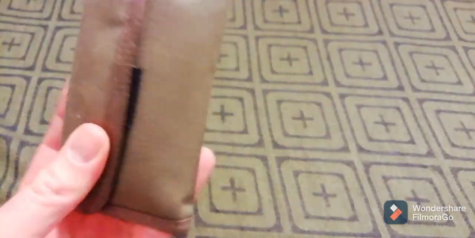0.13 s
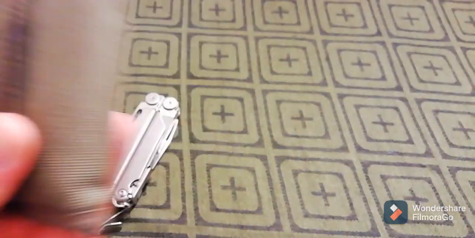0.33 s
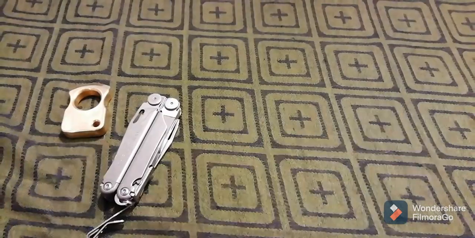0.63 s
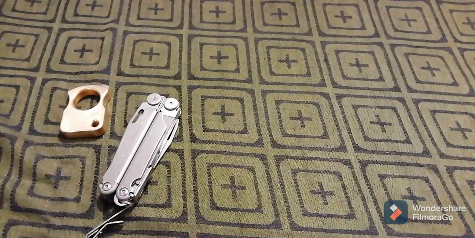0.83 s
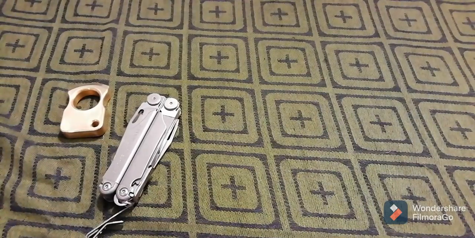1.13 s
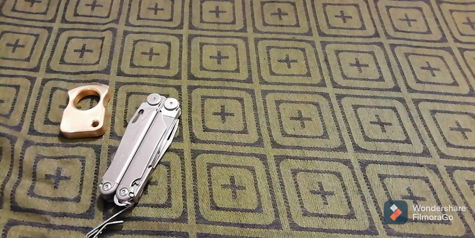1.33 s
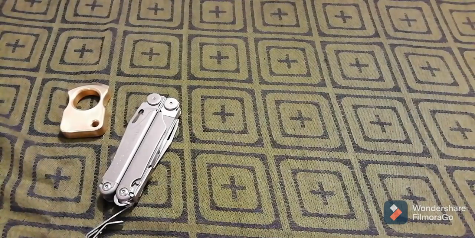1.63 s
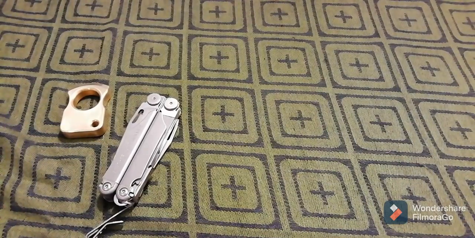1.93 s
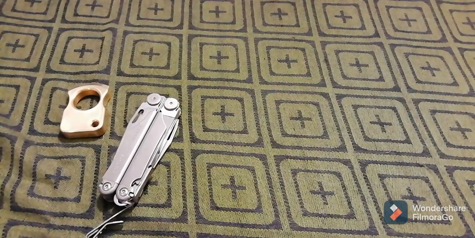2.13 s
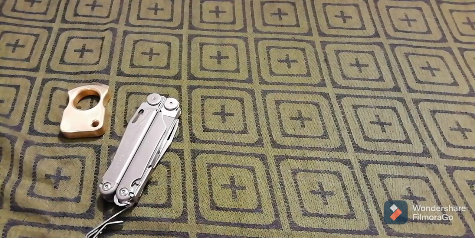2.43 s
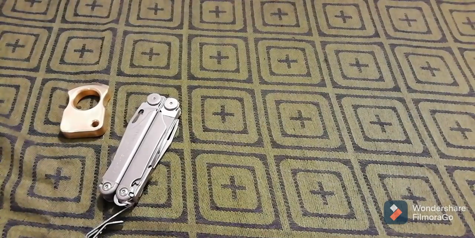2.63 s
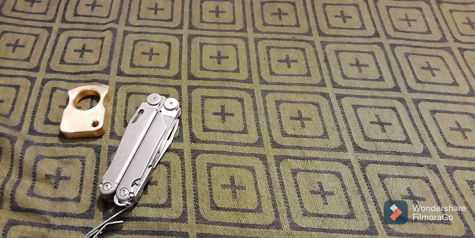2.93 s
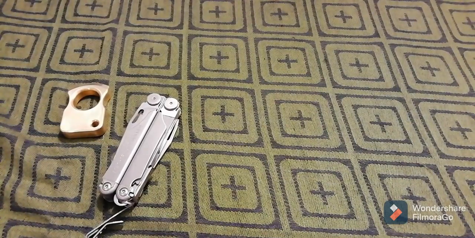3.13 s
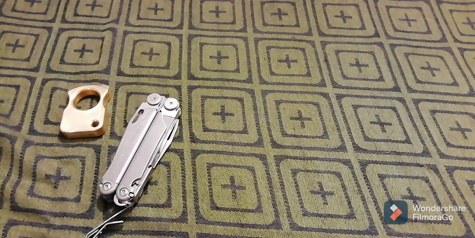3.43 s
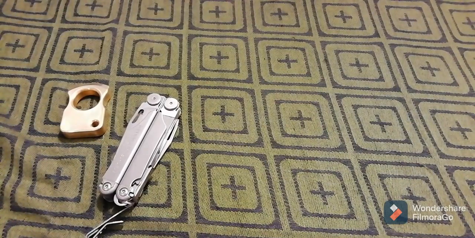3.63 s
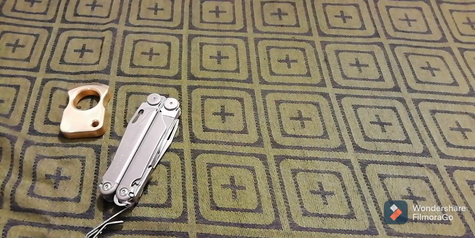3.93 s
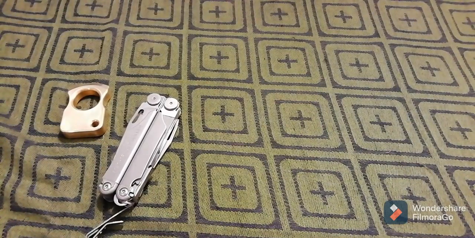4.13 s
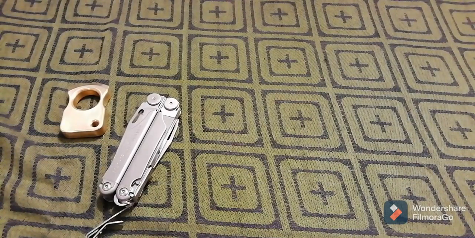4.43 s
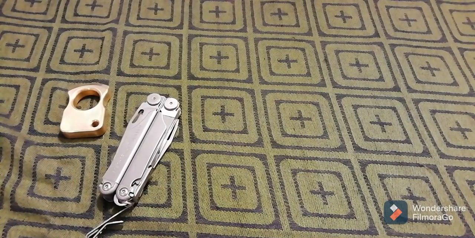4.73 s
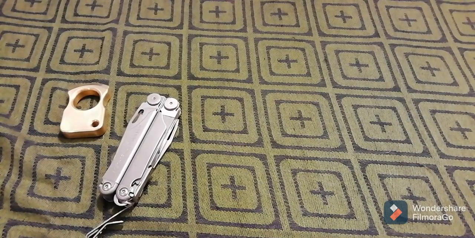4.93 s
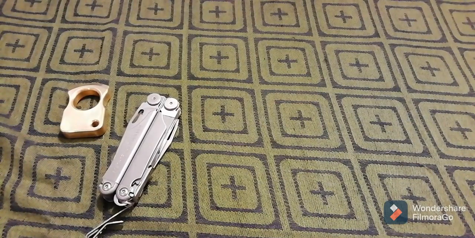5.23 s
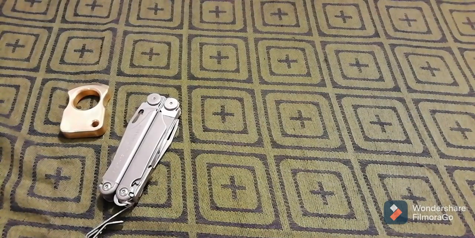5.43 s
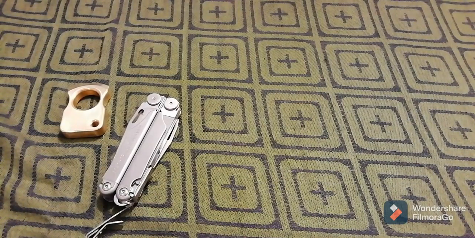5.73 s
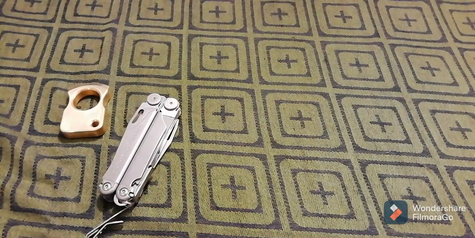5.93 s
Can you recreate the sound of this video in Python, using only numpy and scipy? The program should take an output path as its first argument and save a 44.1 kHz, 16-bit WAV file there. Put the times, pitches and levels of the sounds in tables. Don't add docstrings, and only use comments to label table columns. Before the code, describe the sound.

Cloth slides and crackles gently while single fastener hooks pop, sharp and dry, mostly toward the left. Around a second and a half the wallet sweeps dully across the bed and a tiny burst of hooks tears at once. Afterwards come airy rustles, small scuffs and faint ticks from searching fingers, then a muffled bump as it is put down. Close, dry, faint hiss.

```python
import sys
import numpy as np
from scipy import signal
from scipy.fft import rfft, irfft
from scipy.io import wavfile
from scipy.ndimage import uniform_filter1d

SR = 44100
rng = np.random.default_rng(int(sys.argv[2]) if len(sys.argv) > 2 else 0)


def nominal_scale(level):
    x = np.asarray(level, float) / 20
    return 10 ** x


def generate_wav(sig):
    pcm = np.round(np.clip(np.atleast_2d(sig).T, -1, 1) * 32767).astype(np.int16)
    wavfile.write(sys.argv[1], SR, pcm)


N = 268480


def unit_rms(x):
    return x / np.sqrt(np.mean(x ** 2) + 1e-20)


def read(points, hz):
    f, value = np.transpose(points)
    return np.interp(np.log(hz + 1), np.log(f + 1), value)


def add(mix, start_s, sound):
    part = mix[..., round(start_s * SR):][..., :sound.shape[-1]]
    part += sound[..., :part.shape[-1]]


def band(x, lo_hz, hi_hz):
    edges_hz = [lo_hz, min(hi_hz, 20000)]
    return signal.sosfilt(signal.butter(2, edges_hz, "bandpass", fs=SR, output="sos"), x)


def resonate(x, hz, width_hz):
    return signal.lfilter(*signal.iirpeak(hz, hz / width_hz, SR), x)


def sides(pan_db):
    return nominal_scale(np.outer([.5, -.5], pan_db))


def place(x, pan_db, lag):
    padded = np.pad(x, (0, 64))
    left = np.roll(padded, max(round(lag), 0))
    right = np.roll(padded, max(-round(lag), 0))
    return np.array([left, right])[:, :len(x)] * sides(pan_db)


def wander(count, first, second):
    noise = rng.standard_normal(count)
    return unit_rms(uniform_filter1d(uniform_filter1d(noise, first), second))


def fibres(count, per_s, spread_db, clump_db):
    size = nominal_scale(spread_db * np.minimum(rng.exponential(1, count), 4)) * rng.standard_normal(count)
    slipping = rng.random(count) < per_s / SR
    return unit_rms(size * slipping * nominal_scale(clump_db * wander(count, 500, 300)))


def hush():
    # (frequency [Hz], density [dB per Hz])
    colour = [(30, -1), (60, 0), (150, -4), (400, -17), (700, -18), (1200, -13.5), (3000, -23), (8000, -26),
              (16000, -30)]
    # (frequency [Hz], likeness [0-1])
    likeness = [(60, 1), (300, 0.15), (700, 0.16), (2000, .1)]
    hz = np.fft.rfftfreq(N, 1 / SR)
    left, other = rfft(rng.standard_normal((2, N)))
    same = np.clip(read(likeness, hz), -1, 1)
    right = same * left + np.sqrt(1 - same ** 2) * other
    return nominal_scale(-69.5) * unit_rms(irfft(np.array([left, right]) * nominal_scale(read(colour, hz)), N))


def room(x, tail_db):
    # (delay [s], level [dB])
    echoes = [(.0031, -11), (.0047, -14), (.0091, -14), (.0135, -19), (.0178, -19), (.024, -19)]
    # (frequency [Hz], t60 [s])
    decay = [(100, 0.12), (500, 0.15), (2000, 0.26), (6000, 0.23), (12000, 0.23)]
    taps = np.zeros((2, SR // 2))
    at = np.arange(300, SR // 2 - 20, 20)
    at = at + rng.integers(0, 20, (2, len(at)))
    np.put_along_axis(taps, at, rng.choice([-1., 1.], at.shape), 1)
    hz, t, z = signal.stft(taps, SR, nperseg=256)
    z[1, :2] = .9 * z[0, :2] + .4 * z[1, :2]
    z *= nominal_scale(-60 * t / read(decay, hz)[:, None])
    tail = signal.istft(z, SR, nperseg=256)[1]
    tail *= nominal_scale(tail_db) / np.linalg.norm(tail[0])
    for delay_s, db in echoes:
        scatter = band(rng.standard_normal((2, 90)), 700, 9000) * np.exp(-np.arange(90) / 35)
        scatter -= scatter.mean(1, keepdims=True) - scatter.mean()
        add(tail, delay_s, nominal_scale(db) * scatter / np.linalg.norm(scatter, axis=1, keepdims=True))
    return signal.fftconvolve(x, tail, axes=1)[:, :N]


def strokes(t, band_db, share):
    # (peak time [s], fizz [dB], rise [s], fall [s], weight
    # [dB])
    rubs = [(0.021, -48, 0.49, 0.16, -8.5), (.115, -53.5, 0.22, 0.063, -4), (.27, -53, 0.15, 0.095, -18),
            (.36, -61.5, 0.28, 0.19, 1.5), (0.641, -51.5, 0.092, 0.23, 5.5), (.75, -49, 0.23, 0.084, -3),
            (.79, -51, 0.051, 0.17, 0.5), (.9, -55.5, 0.07, .06, 1.5), (1.07, -52.5, 0.16, 0.13, 7.5),
            (1.173, -50, 0.12, 0.072, -2.5), (1.29, -68.5, 0.12, 0.054, -14),
            (1.37, -53, 0.18, 0.018, 6), (1.44, -60, 0.029, 0.3, 19), (1.66, -52.5, 0.55, 0.072, 5.5),
            (1.762, -57, 0.012, 0.26, 16), (1.9, -46.5, 0.48, 0.11, -3.5),
            (2.062, -59, 0.13, 0.0885, -3.5), (2.168, -70, 0.032, .3, -5), (2.44, -63, 0.079, 0.27, -7),
            (2.55, -58, 0.78, 0.24, -0.5), (2.632, -44.5, 0.041, 0.22, -6.5),
            (2.74, -48.5, 0.23, .12, -3), (2.81, -39, 0.051, 0.022, 0.5), (2.859, -41, 0.12, 0.028, 5),
            (2.904, -56.5, .1, .03, -0.5),
            (3.05, -59, 0.087, 0.04, -13), (3.157, -61.5, 0.041, 0.097, 8),
                 (3.322, -59, 0.016, 0.083, 5.5), (3.46, -58, 0.18, 0.054, 9.5),
                 (3.52, -57.5, 0.08, 0.13, -22), (3.619, -47, 0.128, 0.12, 5),
                 (3.77, -52, 0.031, 0.17, 5.5), (3.857, -54, 0.2, 0.046, 8.5),
                 (3.949, -56, 0.12, 0.049, 7.5), (4.14, -63, 0.056, 0.045, 10.5),
                 (4.62, -71.5, 0.25, 0.13, 0), (4.82, -53.5, 0.0496, 0.12, -4.5),
                 (4.92, -54, 0.056, 0.06, 2), (4.952, -46.5, 0.04, 0.1, 7.5),
                 (5.058, -53, 0.027, 0.077, 11), (5.25, -70, 0.7, 0.51, 11.5),
                 (5.392, -49.5, 0.082, 0.074, 0.5), (5.5, -62, 0.23, 0.4, 6.5),
                 (5.68, -73.5, 0.041, 0.15, 13), (5.91, -65, 0.41, .03, 3),
                 (5.939, -29, 0.011, 0.086, -4.5), (5.99, -42, 0.054, 0.2, -0.5),
                 (6.06, -51, 0.13, 0.066, -4)]
    drop_db, roundness = 24, 1.17
    power = np.zeros(len(t))
    for peak_s, fizz_db, rise_s, fall_s, weight_db in rubs:
        before = (peak_s - t) / max(rise_s, .004)
        after = (t - peak_s) / max(fall_s, .004)
        away = np.where(t < peak_s, before, after)
        power += nominal_scale(2 * (fizz_db + band_db + share * weight_db - drop_db * away ** roundness))
    return np.sqrt(power)


def rustle():
    # (time [s], left-right [dB])
    where = [(0.0, 0), (1.01, 5), (1.178, -7.5), (1.32, 2), (1.83, -1.5), (2.01, 2), (3.67, 0.5), (3.74, 2),
             (4.05, 0.5), (4.88, 1.5), (5.84, 1.5), (6.08, -0.5)]
    # (low [Hz], high [Hz], level re fizz [dB], share of the weight [ratio])
    layers = [(6340, 22000, 2.5, 0.011), (2700, 4380, -6.5, 0.28), (705, 2030, -7.5, 0.77),
              (237, 500, -18.5, 1.236)]
    patch_leads = [-24, -17, -9, -3, 6]
    held_s, pan_db = np.transpose(where)
    t = np.arange(N) / SR
    coarse = t[::64]
    crackles = fibres(N, per_s=400, spread_db=1.5, clump_db=2.5)
    slips = .6 * place(crackles, 0, -9)
    for lag in patch_leads:
        slips += place(fibres(N, per_s=4000, spread_db=2.5, clump_db=2.2), 0, lag)
    flutter = wander(N, 600, 400)
    out = np.zeros((2, N))
    for lo, hi, db, share in layers:
        side = sides(np.interp(t, held_s, pan_db) * (hi > 1000))
        heard = slips if hi > 1000 else slips.mean(0) + .6 * slips
        sound = unit_rms(band(heard, lo, hi))
        if hi < 1000:
            sound += 0.6 * unit_rms(band(band(heard, 53, 120), 30, 200))
        level = np.interp(t, coarse, strokes(coarse, db, share))
        flutter_db = 1.6 if lo > 2000 else 2.8
        out += sound * level * nominal_scale(flutter_db * flutter) * side
    return out


def drag():
    # (frequency [Hz], width [Hz], level [dB])
    folds = [(330, 190, -4), (1150, 450, -6.5), (1940, 440, -3), (6140, 520, -8)]
    length_s = 0.086
    t = np.arange(0, length_s, 1 / SR)
    slips = fibres(len(t), per_s=2500, spread_db=2.0, clump_db=2.0)
    sound = np.zeros(len(t))
    for hz, w, db in folds:
        sound += nominal_scale(db) * unit_rms(resonate(resonate(slips, hz, w), hz, 0.9 * w))
    sound *= signal.windows.tukey(len(t), .15)
    return nominal_scale(-61.5 + 3.0 * t / length_s) * place(sound, 0.42, -2.9)


def scuff(db, hz, length_s):
    t = np.arange(round(.15 * SR)) / SR
    slips = fibres(len(t), per_s=3000, spread_db=2.2, clump_db=1.0)
    fold = unit_rms(resonate(resonate(slips, hz, .14 * hz + 25), hz, .5 * hz + 40))
    shape = (1 - np.exp(-t / (0.068 * length_s))) * np.exp(-t / np.clip(length_s, .004, .06))
    fold, slips = (x / np.sqrt(np.average(x ** 2, weights=shape ** 2)) for x in (fold, slips))
    scratch = unit_rms(band(slips, hz / 2, 3.8 * hz))
    return nominal_scale(db - 5.0) * place((fold + 0.12 * scratch) * shape, 0.71, -3.0)


def swipe():
    # (time [s], pressure [dB])
    sweep = [
        (1.42, -65),
        (1.463, -42.5),
        (1.493, -29.5),
        (1.539, -27),
        (1.577, -31),
        (1.602, -36.5),
        (1.65, -57.5),
        (1.74, -65),
    ]
    # (frequency [Hz], width [Hz], level [dB])
    ribs = [(620, 300, -10), (880, 360, -7.5), (1640, 180, -3.5), (3250, 640, -7), (3900, 900, -2),
            (4740, 200, -3), (8140, 2000, -1.5), (13100, 2500, -3)]
    s, pressure_db = np.transpose(sweep)
    t = np.arange(s[0], s[-1], 1 / SR)
    near = fibres(len(t), per_s=6000, spread_db=2.0, clump_db=1.0)
    wide = fibres(len(t), per_s=6000, spread_db=2.0, clump_db=1.0)
    slips = place(near, 0, -2) + .8 * place(wide, 0, -21)
    now_db = np.interp(t, s, pressure_db)
    slack_db = now_db - pressure_db.max()
    weave = np.zeros((2, len(t)))
    for hz, w, db in ribs:
        rib = unit_rms(resonate(resonate(slips, hz, w), hz, 3 * w))
        weave += nominal_scale(db - 4.5 + 100.0 / w * slack_db) * rib
    scrape = unit_rms(band(near, 220, 480))
    sound = weave * nominal_scale(now_db + 1.0) + scrape * nominal_scale(now_db - 18.0)
    out = np.zeros((2, N))
    add(out, s[0], sound * signal.windows.tukey(len(t), .1))
    return out


def boom(db, start_hz, end_hz, length_s):
    u = np.linspace(0, 1, round(2 * length_s * SR))
    swings = np.sin(2 * np.pi * np.cumsum(start_hz + (end_hz - start_hz) * u) / SR)
    return nominal_scale(db) * swings * np.sin(np.pi * u) ** 2


def thud():
    # (frequency [Hz], level [dB], t60 [s])
    modes = [(134.5, -8, 0.088), (230, -10, 0.069), (342, -4.5, 0.067), (885, 4, 0.054), (1560, 2.5, 0.022)]
    t = np.arange(round(.2 * SR)) / SR
    rings = sum(nominal_scale(db - 60 * t / t60) * np.sin(2 * np.pi * hz * t) for hz, db, t60 in modes)
    settle = fibres(len(t), per_s=1500, spread_db=3, clump_db=3)
    for lo_hz, hi_hz in [(250, 1800), (200, 1700), (150, 1700)]:
        settle = band(settle, lo_hz, hi_hz)
    body = rings / abs(rings).max() + 0.2 * unit_rms(settle) * np.exp(-t / 0.042)
    return nominal_scale(-30) * place(body * (1 - np.exp(-t / 0.00088)), -2.2, 22.8)


def hook(panel_db, hz, tick_db, pan_db):
    push_db = panel_db - 24.5 + 2.5 * min(pan_db, 10.5)
    t = np.arange(900) / SR
    grit = .5 * band(rng.standard_normal(len(t)), 2000, 14000) * np.exp(-t / .0013)
    snap = 2.07 * np.exp(-t / .00006) * np.cos(2 * np.pi * 9500 * t)
    tick = nominal_scale(tick_db + 3.0) * (snap + grit)
    cycles = 0.85 * hz * t + 0.26 * (1 - np.exp(-t * hz / .6))
    swing = np.sin(2 * np.pi * cycles) * np.exp(-t * hz / .55) * (1 - np.exp(-t * hz / 0.12))
    panel = nominal_scale(panel_db + 5.5) * band(swing, .45 * hz, 20000)
    push = nominal_scale(push_db - 5.0) * band(np.sin(2 * np.pi * 750 * t) * np.exp(-t / 0.00098), 690, 4200)
    lag = -1.5 * pan_db - 7
    sharp = place(band(tick, 2500, 15000), pan_db, lag) + place(panel, .75 * pan_db, lag)
    return sharp + place(push, .4 * pan_db, 2.1 * lag)


def rip():
    # (time [s], panel [dB], tick [dB])
    run = [
        (1.776, -28, -21.5),
        (1.7778, -12, -13),
        (1.7803, -21, -17),
        (1.7822, -10.5, -11),
        (1.7847, -18, -10.5),
        (1.7863, -17.5, -7),
        (1.7892, -5, -4.5),
        (1.7891, -18, -12.5),
        (1.792, -15, -18),
        (1.7939, -16.5, -6),
    ]
    out = np.zeros((2, N))
    for (s, panel_db, tick_db), (pitch, side) in zip(run, rng.uniform(-1.1, 1, (len(run), 2))):
        hz = 3470 * (1 + 0.22 * pitch)
        add(out, s, hook(panel_db, hz, tick_db, 1.8 + 5.0 * side))
    return out


def scene():
    # (time [s], peak [dB], fold [Hz], length [s])
    scuffs = [(2.796, -51, 1266, 0.0081), (2.831, -41, 1680, 0.015), (3.065, -51, 1970, 0.0056),
              (3.316, -53.5, 1720, 0.027), (3.413, -44, 314, 0.0033), (3.444, -48.5, 1750, 0.0071),
              (3.539, -48.5, 2160, 0.043), (3.609, -41.5, 340, 0.0087), (3.744, -53, 1000, 0.012),
              (3.806, -40.5, 930, 0.0077), (3.845, -42.5, 920, 0.0065), (0.029, -59, 900, 0.071),
              (3.941, -41, 1494, 0.0092), (3.938, -51, 2100, 0.018), (3.58, -49, 350, 0.0088),
              (4.115, -51.5, 350, 0.021), (4.068, -57.5, 1740, 0.014), (4.16, -51.5, 1900, 0.015),
              (4.132, -45, 1595, 0.0067), (4.946, -38.5, 490, 0.011), (5.062, -55, 1450, 0.0095),
              (1.779, -28.5, 1030, 0.012), (1.782, -25.5, 1680, 0.01), (3.162, -59, 2800, 0.02),
              (5.232, -48.5, 2280, 0.0096), (5.34, -61, 2800, 0.012), (5.379, -44.5, 3030, 0.027),
              (5.937, -34, 4100, 0.012), (5.931, -37, 800, 0.011), (2.631, -50, 2120, 0.012),
              (3.572, -43, 2400, 0.012), (3.584, -53, 740, 0.0051), (3.3, -51, 340, 0.0066),
              (3.614, -43.5, 2200, 0.028), (3.62, -40, 3900, 0.0078), (3.809, -44.5, 2350, 0.011),
              (3.848, -47, 2350, .01), (3.4, -51, 1050, 0.0089), (3.909, -55, 1040, .01),
              (4.806, -47, 2200, .006), (4.818, -46, 1960, 0.0087), (4.973, -48, 2400, .008),
              (4.98, -51, 1400, .008), (4.989, -46, 2700, .006), (4.957, -46, 1050, 0.0069),
              (5.689, -52.5, 1700, 0.012), (5.713, -52, 840, 0.01), (5.236, -60, 360, .01)]
    # (time [s], peak [dB], mattress [Hz], length [s])
    bumps = [(0.759, -57, 126, 0.041), (1.443, -51, 128, 0.03), (1.715, -50.5, 330, 0.015),
             (1.689, -44, 280, 0.014), (1.763, -47.5, 400, 0.011), (1.81, -46, 295.4, 0.024),
             (1.779, -32, 640, 0.0093), (1.785, -41.5, 75.8, 0.018), (2.159, -53, 100, 0.023),
             (2.627, -45, 115.1, 0.017), (2.785, -55, 86.1, 0.021), (3.444, -49, 48.4, 0.011),
             (4.956, -42.5, 61.9, 0.016), (5.06, -40, 84, 0.0063), (5.714, -46, 200, 0.0091),
             (5.745, -51.5, 203, 0.01), (5.686, -49, 340, 0.006), (6.035, -48, 67.3, 0.02)]
    # (middle [s], peak [dB], start [Hz], end [Hz], length [s])
    booms = [(1.467, -40, 330, 300.7, .014), (1.493, -35, 320, 290, .014), (1.526, -35, 320, 288.5, 0.023),
             (1.573, -33, 365, 290.5, .03), (1.615, -46.5, 330, 320, .02), (1.495, -43, 130, 145, .04),
             (1.55, -45.5, 177, 150, .025), (1.597, -33, 155.7, 120, .028), (1.634, -45, 130, 115, .02),
             (1.697, -49, 130.8, 110, 0.018), (1.787, -42.5, 279.8, 240, .013),
             (5.677, -41.5, 170, 109, 0.0096), (5.684, -48, 75, 55, .025), (5.735, -48.5, 150, 120, .015)]
    # (time [s], panel [dB], panel [Hz], tick [dB], left-right [dB])
    hooks = [(0.5517, -45, 1820, -69, 14), (0.777, -26, 1400, -29.5, 10.5), (0.7976, -51, 3488, -34, -1.5),
             (0.9728, -3.5, 2700, -17, 8), (1.0088, -5.5, 2220, -14, 7), (1.0175, -11.5, 2500, -18, 8),
             (1.307, -14, 2930, -16, 9), (1.4472, -37, 3703, -42, 12), (1.4663, -30, 3900, -35, -2),
             (2.167, -50, 1432, -57.5, 2.5), (2.4671, -40, 5120, -35.5, 9), (2.8441, -26, 2280, -22.5, 5),
             (2.846, -32, 1700, -29, 2.5), (3.062, -52, 1490, -61, -2), (3.3175, -50, 1700, -56, 0),
             (3.7626, -29.5, 2370, -38, 15.5), (3.9163, -46, 2500, -38.5, 5.5),
             (4.6087, -56.5, 1315, -55, 8.5), (4.768, -45, 2210, -48, 8), (4.807, -38, 2300, -53, 1),
             (4.818, -48, 2160, -46, -4), (4.8869, -24, 2980, -39.5, 9.5), (4.8897, -38, 3300, -45, 4),
             (4.9492, -53, 5150, -33, 12.5), (5.055, -32.5, 1780, -44.5, 4), (5.169, -41.5, 2100, -44, 5.5),
             (5.3708, -41, 3096, -36, 11)]
    # (panel [dB], panel [Hz], tick [dB], left-right [dB])
    edge_click = (-48, 948, -64, -4.5)
    put_down_s = 5.6608
    wallet = rustle()
    add(wallet, 2.994, drag())
    for s, *row in scuffs + bumps:
        add(wallet, s, scuff(*row))
    wallet += swipe()
    for middle_s, db, start_hz, end_hz, length_s in booms:
        add(wallet, middle_s - length_s, boom(db, start_hz, end_hz, length_s))
    add(wallet, put_down_s, hook(*edge_click))
    add(wallet, put_down_s, thud())
    for s, *row in hooks:
        add(wallet, s, hook(*row))
    wallet += rip()
    return wallet + room(wallet, tail_db=-8.5) + hush()


def top_cut(x):
    return signal.sosfilt(signal.butter(12, 16490, fs=SR, output="sos"), x)


def record(dry):
    # (frequency [Hz], gain [dB])
    response = [(25, -7), (130, -4), (320, -1), (540, -2), (900, -2.5), (2000, -0.5), (4800, 4.5),
                (6200, 2.5), (7400, 4.5), (8300, 8), (9200, 3), (10300, -7), (13500, -13), (16000, -27.5)]
    log_gain = np.log(nominal_scale(read(response, abs(np.fft.fftfreq(4096, 1 / SR)))))
    taps = np.fft.ifft(np.exp(np.conj(signal.hilbert(log_gain)))).real[:2048]
    heard = signal.oaconvolve(dry, taps[None], axes=1)[:, :N]
    heard += nominal_scale(-81) * rng.standard_normal(dry.shape)
    return top_cut(.75 * np.tanh(heard / .75))


dry = scene()
out = record(dry)
generate_wav(out)
```